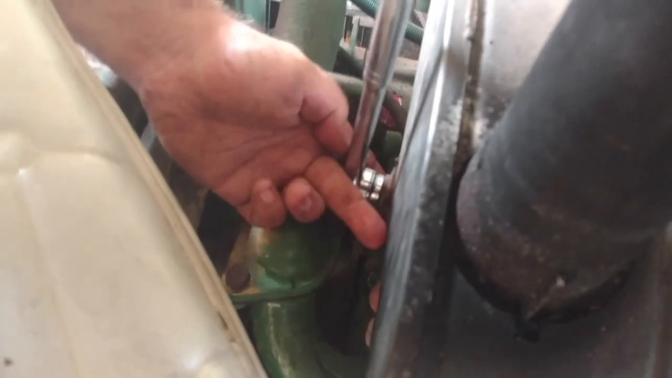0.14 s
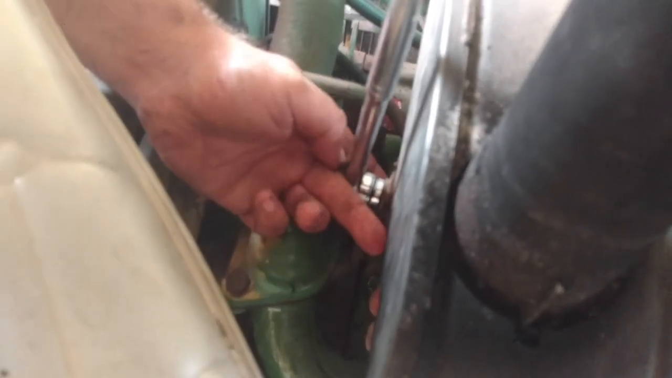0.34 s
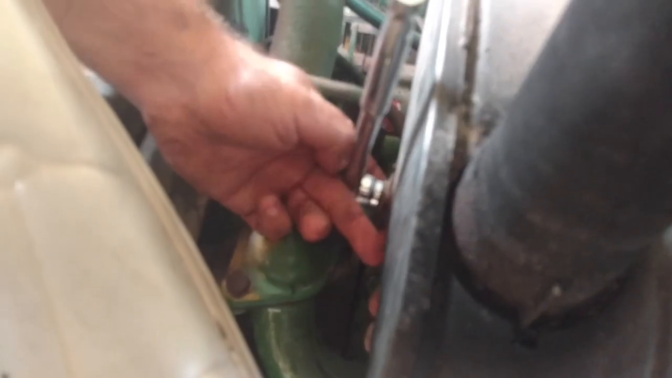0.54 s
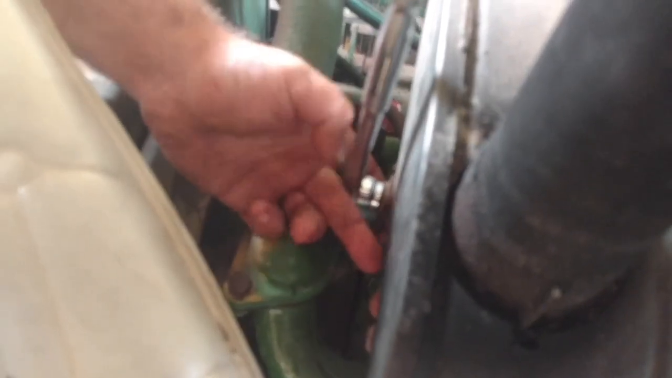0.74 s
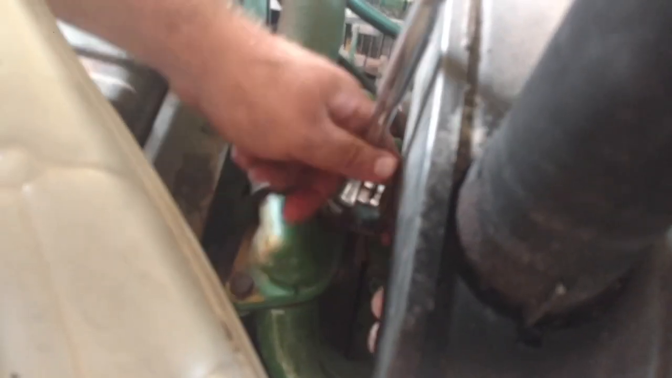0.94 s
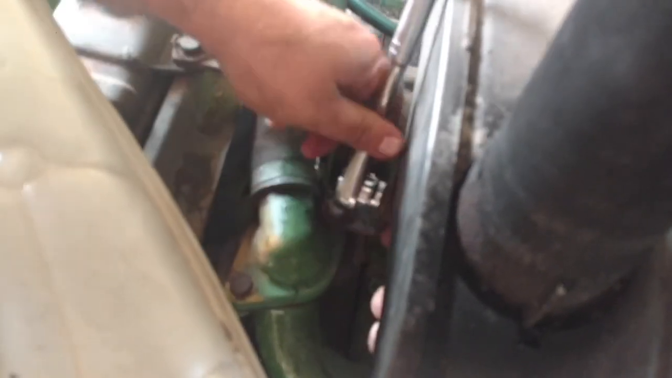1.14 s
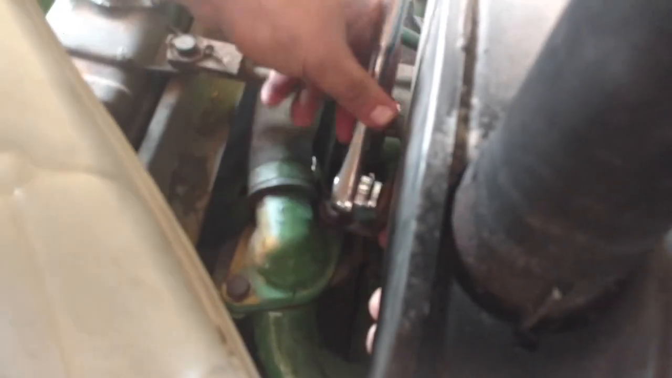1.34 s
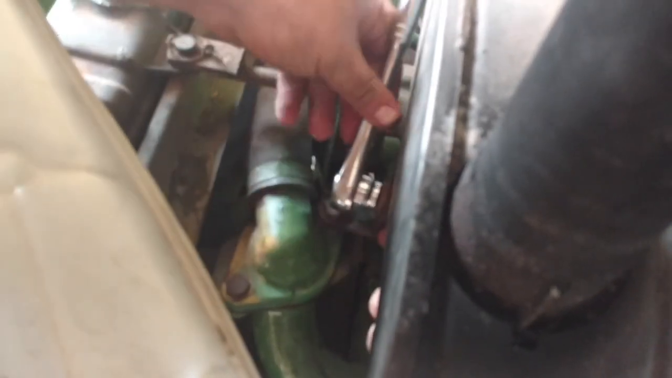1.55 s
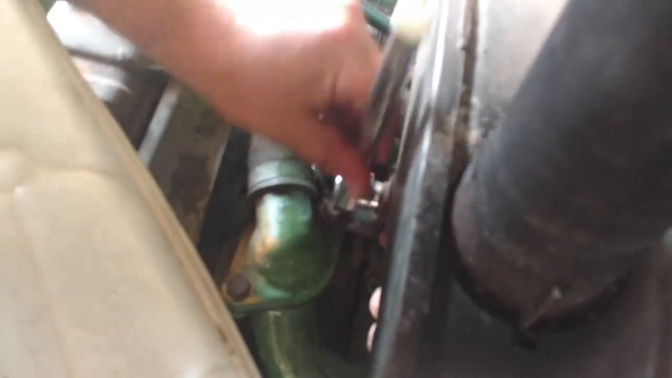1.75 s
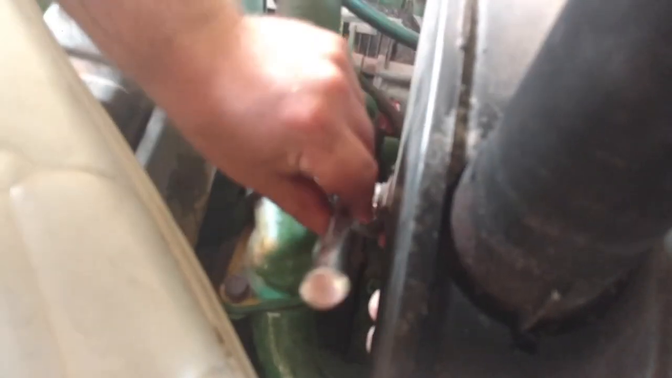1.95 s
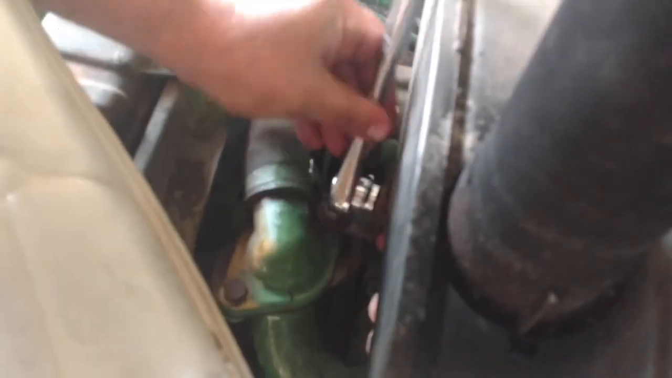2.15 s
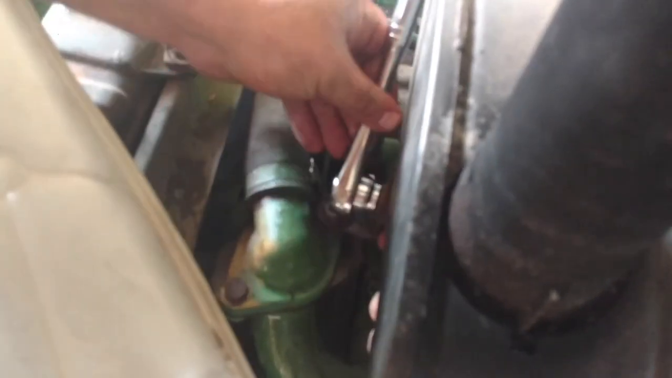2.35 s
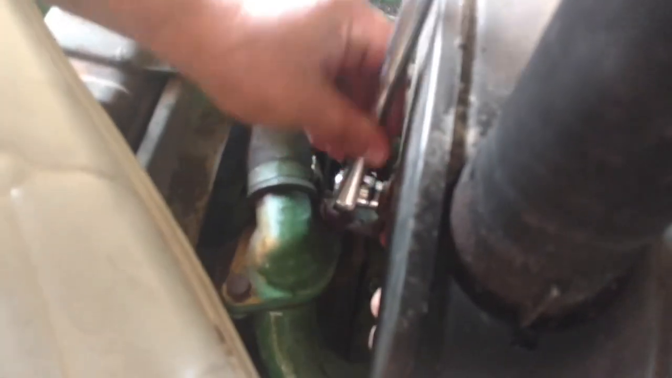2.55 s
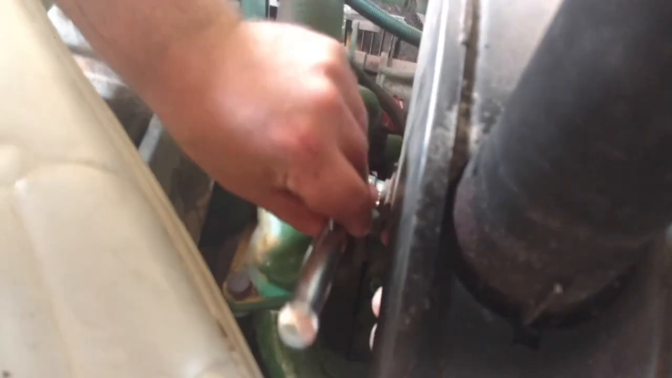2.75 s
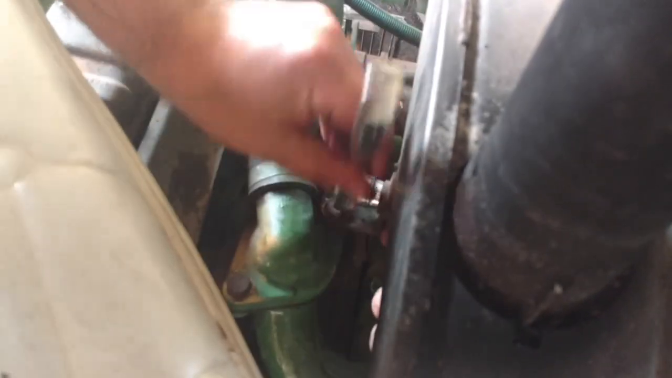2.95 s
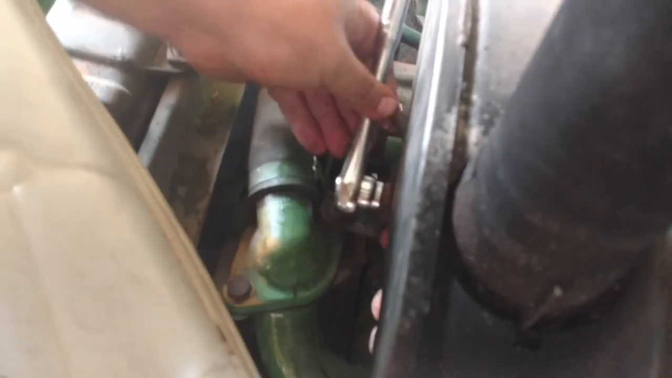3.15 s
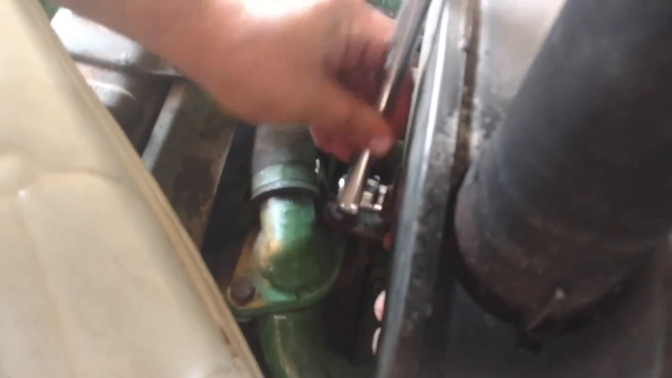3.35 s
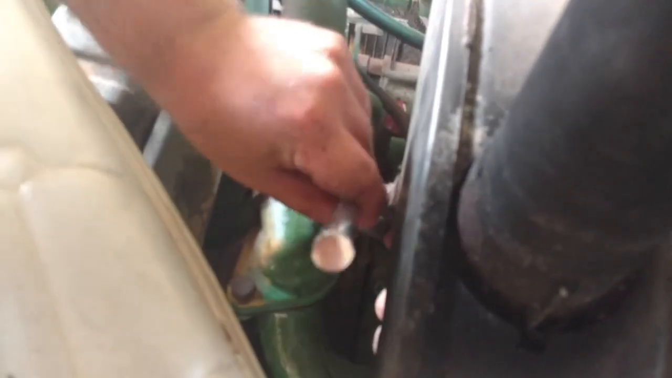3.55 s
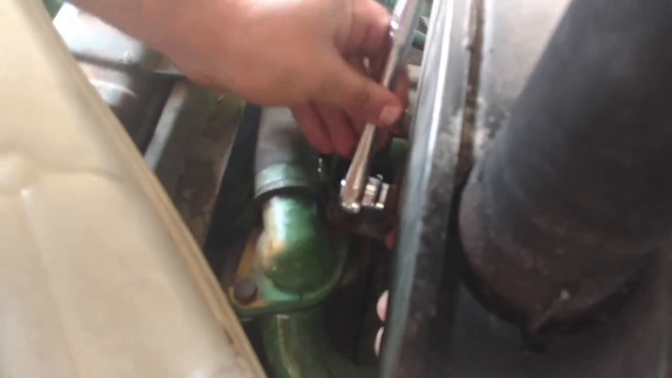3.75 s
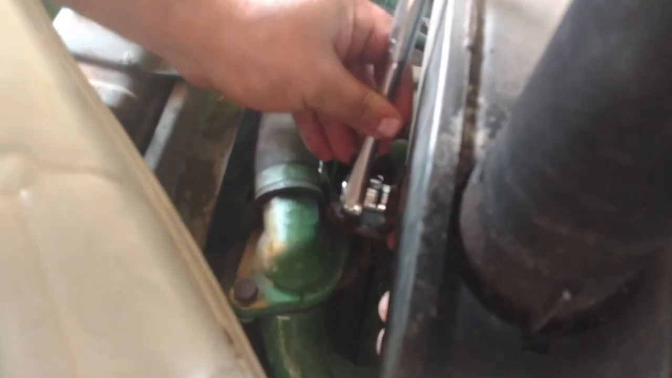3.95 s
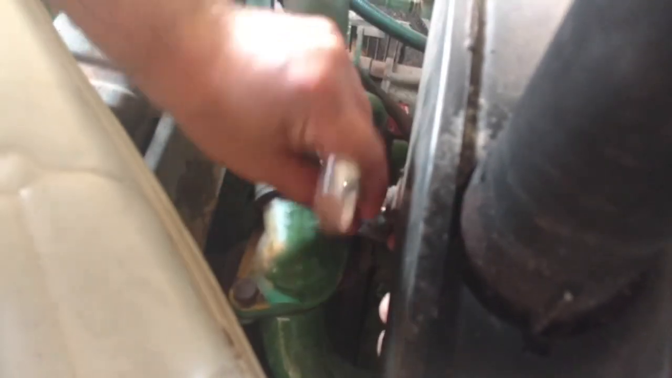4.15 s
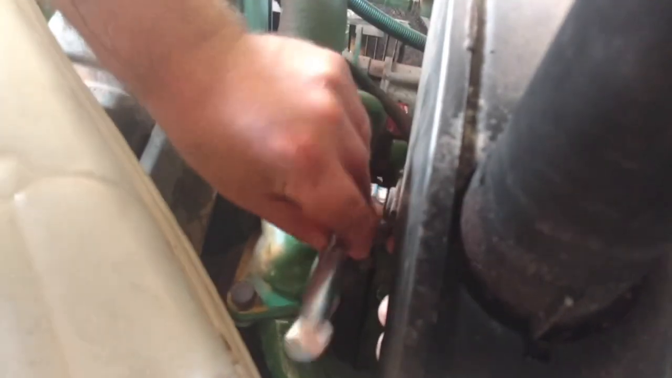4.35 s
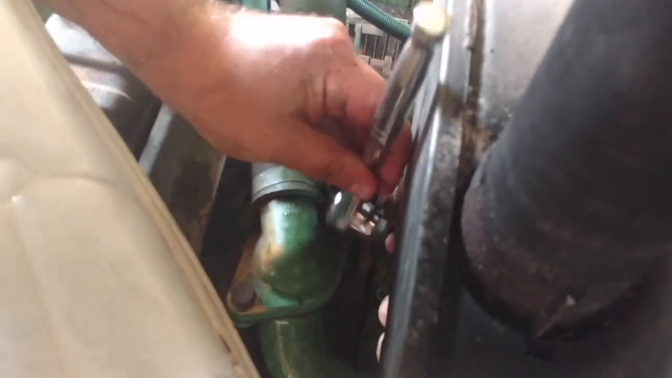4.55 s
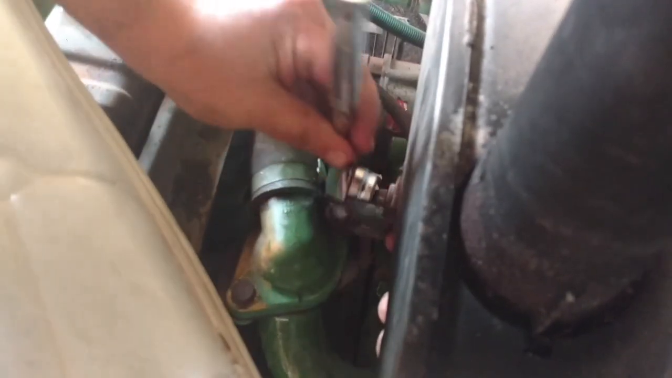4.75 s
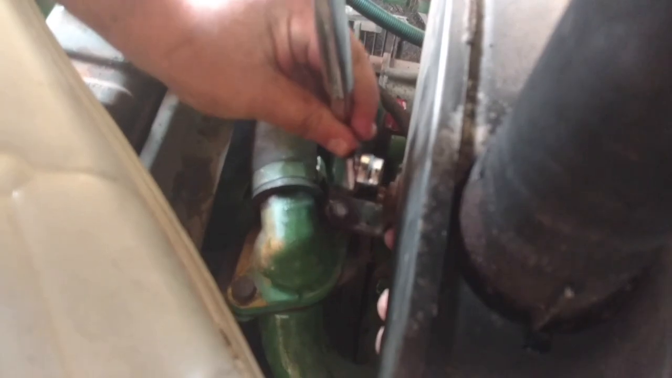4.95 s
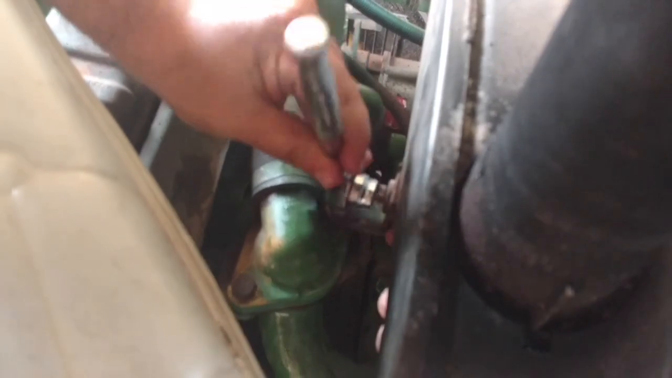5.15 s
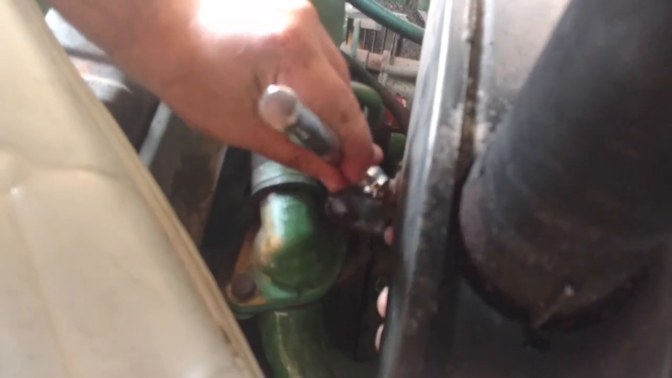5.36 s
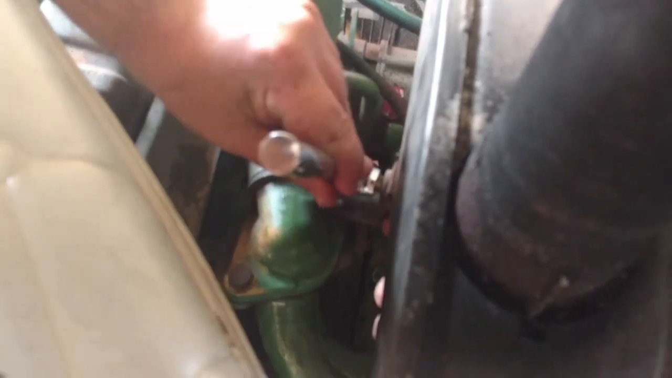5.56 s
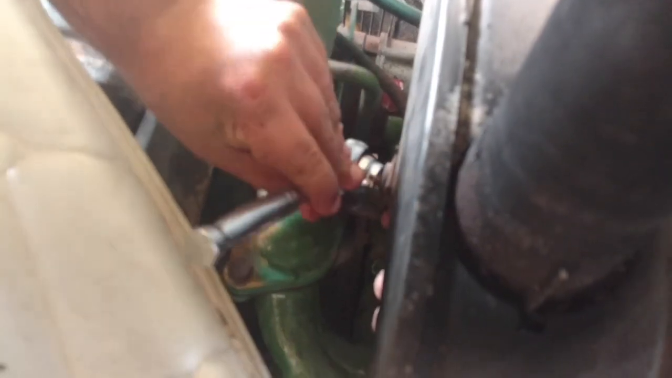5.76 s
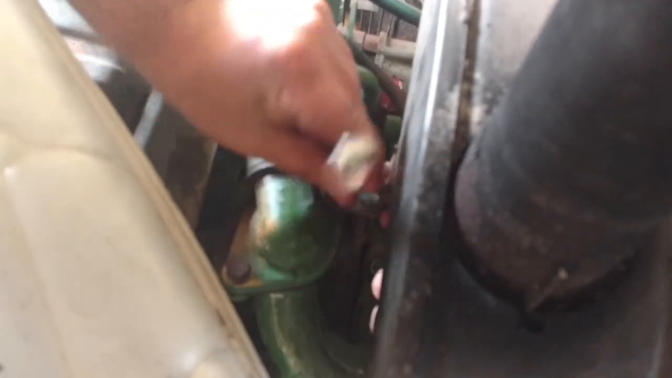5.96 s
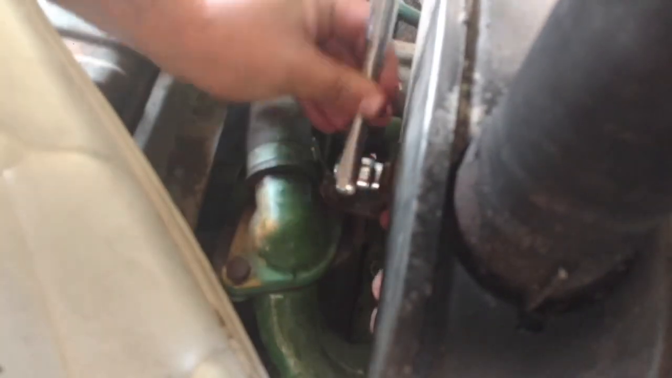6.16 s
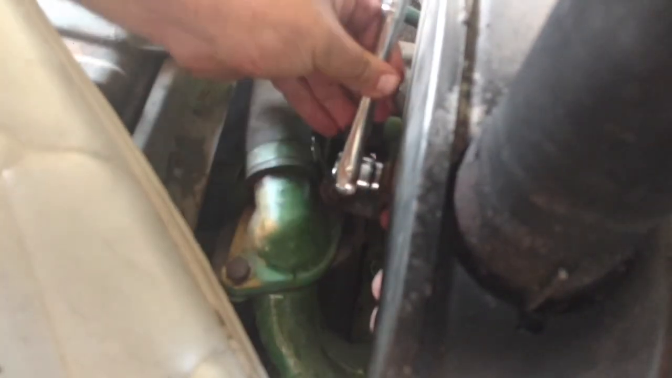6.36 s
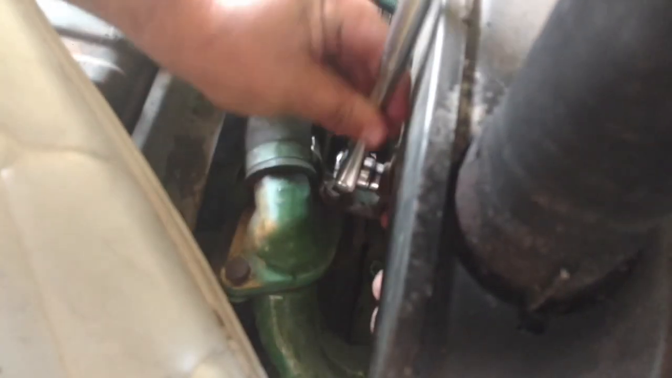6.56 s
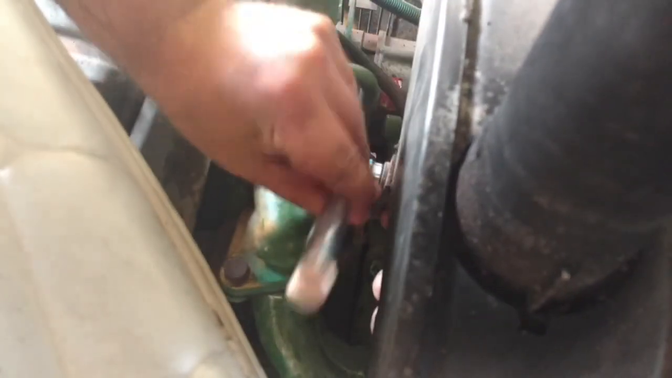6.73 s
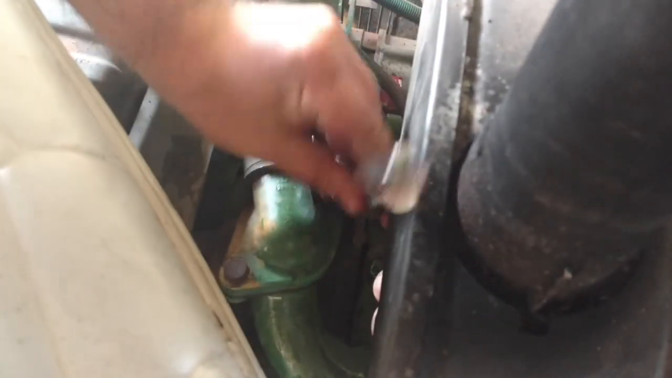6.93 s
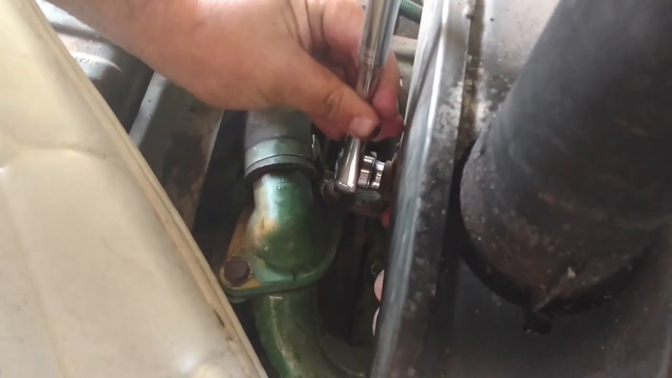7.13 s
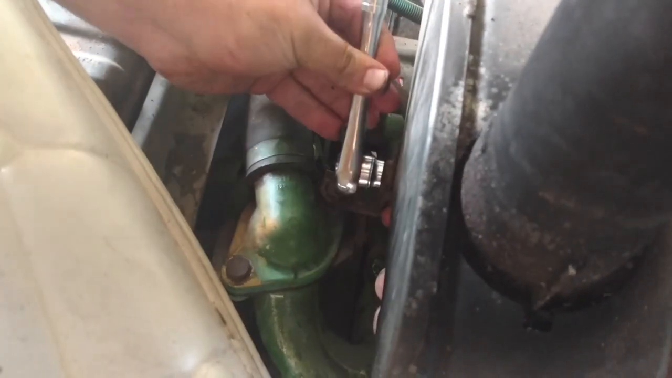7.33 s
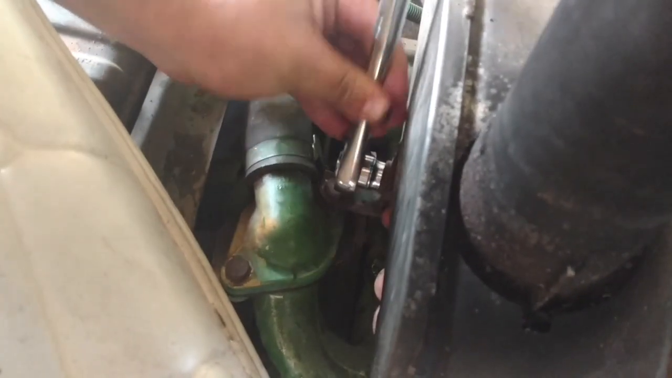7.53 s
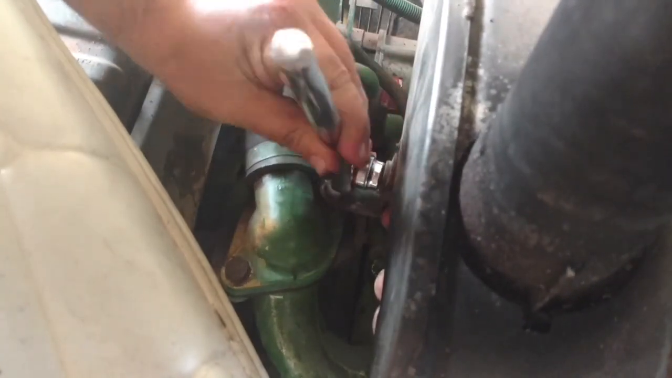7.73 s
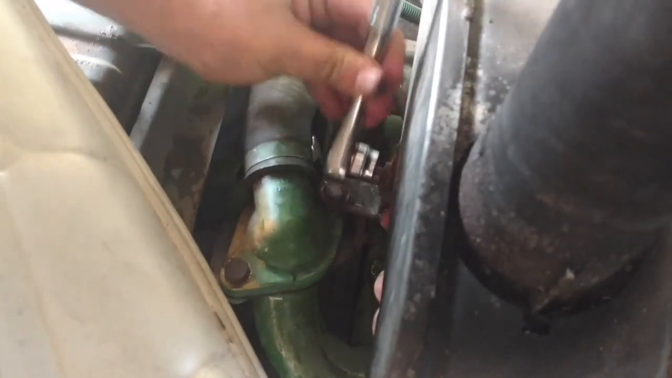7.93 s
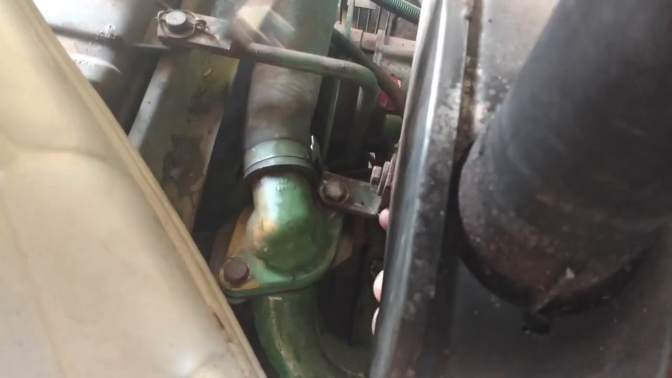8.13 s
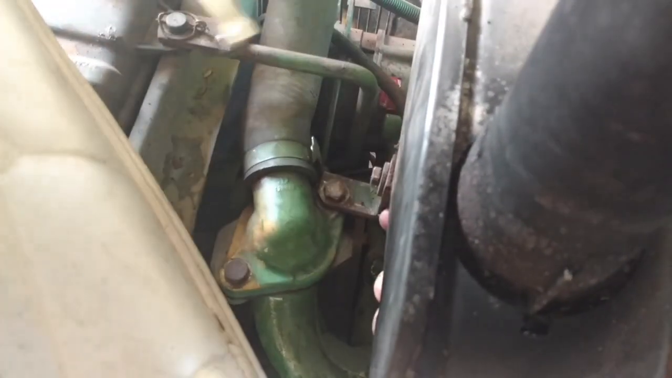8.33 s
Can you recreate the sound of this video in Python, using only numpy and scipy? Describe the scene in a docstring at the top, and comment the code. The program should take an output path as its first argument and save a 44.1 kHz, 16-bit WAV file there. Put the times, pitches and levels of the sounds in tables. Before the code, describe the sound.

Steel ratchet ticks, crisp and very short, alternate with duller clinks of the tool on engine castings. The first second is nearly quiet, then a loud clank; rapid click bursts follow around three and six seconds, with looser rattling and scraping between. Later contacts grow sparse and soft. Outdoor air, steady insects and faint hum surround the close stereo sound; short reflections from the metal, and two faint hoarse yaps from a small dog finish it.

```python
"""Socket ratchet inside an engine

A hand works a socket ratchet on a nut between the parts of a silent engine, outdoors.
Pawl snaps, knocks and rubbing drive damped resonators for the ratchet head and the engine castings.
Insects, hums and air are shaped noise; their level dips at some bright clicks, then climbs back.
A small dog yaps twice, as hoarse harmonic stacks. Two microphone ports lie apart."""
import sys
import numpy as np
from scipy import signal
from scipy.fft import rfft, irfft, next_fast_len
from scipy.io import wavfile
from scipy.ndimage import map_coordinates

SR = 44100
rng = np.random.default_rng(int(sys.argv[2]) if len(sys.argv) > 2 else 0)


def voltage_ratio(level):
    """Linear amplitude factor for a level in decibels (scalar or array-like)."""
    return 10 ** (np.asarray(level, float) / 20)


def transcribe(u):
    """Save the signal u as a 16-bit wav file named by the first command-line argument.

    u: samples, shape (n,) or (channels, n), limited to [-1, 1]; the rate is SR.
    q: integer samples, one column per channel.
    """
    v = np.clip(np.atleast_2d(u).T, -1, 1)
    q = np.round(v * 32767).astype(np.int16)
    wavfile.write(sys.argv[1], SR, q)


N = 369999


def rms_one(x):
    """Scales to rms 1."""
    return x / np.sqrt(np.mean(x ** 2) + 1e-20)


def in_time(rows):
    """Columns of a table interpolated over the scene; the first column is seconds."""
    s, *columns = np.transpose(rows)
    return [np.interp(np.arange(N) / SR, s, c) for c in columns]


def at_hz(points, hz):
    """Table value at each frequency, linear in log frequency."""
    table_hz, value = np.transpose(points)
    return np.interp(np.log(hz + 1), np.log(table_hz), value)


def drift(knots_per_s):
    """Slow chance: straight lines between random knots of spread 1."""
    knots = rng.standard_normal(int(N / SR * 40) + 2)
    position = np.arange(N) / SR * np.clip(knots_per_s, .1, 39)
    return map_coordinates(knots, [position], order=1)


def ring(drive, hz, t60_s):
    """Damped resonator: a unit click sets a sine of height 1 ringing."""
    r, w = voltage_ratio(-60 / (t60_s * SR)), 2 * np.pi * hz / SR
    return signal.lfilter([0, np.sin(w)], [1, -2 * r * np.cos(w), r * r], drive + 1e-18)


def strike(times_s, modes, strength_db, rise_s, contact_s, rattle_db, rattle_s):
    """Each contact, a sharp chatter and grainy dying rattle, strikes every mode by a chance strength."""
    low_cut_hz = 200   # struck sounds are cut below this
    age_s = np.arange(3000) / SR
    snap = (1 - np.exp(-age_s / rise_s)) * np.exp(-age_s / contact_s)
    noise, grain = rng.standard_normal((2, len(times_s), 3000))
    rattle = voltage_ratio(rattle_db) * np.exp(-age_s / rattle_s) * grain ** 2
    chatter = noise * (snap + rattle)
    chatter /= np.sqrt(np.sum(chatter[:, :200] ** 2, axis=1, keepdims=True))
    luck_db = 2 * rng.standard_normal((len(times_s), len(modes)))
    starts = np.round(times_s * SR).astype(int)
    at = np.minimum(starts[:, None] + np.arange(3000), N - 1)
    out = np.zeros(N)
    for k, (hz, db, t60_s) in enumerate(modes):
        # what the chatter holds at this pitch
        share = np.abs(chatter[:, :300] @ np.exp(2j * np.pi * hz * age_s[:300]))
        height = voltage_ratio(db + strength_db(hz) + luck_db[:, k]) / np.sqrt(share ** 2 + .25)
        blows = chatter * height[:, None]
        out += ring(np.bincount(at.ravel(), blows.ravel(), N), hz, t60_s) * (-1) ** k
    return signal.sosfilt(signal.butter(2, low_cut_hz, "high", fs=SR, output="sos"), out)


def thumps(times_s, db, hz, t60_s):
    """Short dull jolts, of opposite sign at the two ports."""
    clicks = np.bincount(np.round(times_s * SR).astype(int), voltage_ratio(db), N)
    band = signal.butter(2, [0.74 * hz, 4 * hz], "band", fs=SR, output="sos")
    return signal.sosfilt(band, ring(clicks, hz, t60_s)) * [[1], [-.75]]


# Pawl snaps and other steel-on-steel ticks.
# Each row: start in seconds, level in dB, modes below 7500 Hz re level in dB, thump re level in dB.
PAWL_TICKS = [(1.0153, -38.5, 3.5, -11), (1.4232, -17, -15, 2), (2.128, -21.5, 1, -39), (2.139, -23, 0, -4),
              (2.543, -51, 7, 6), (2.9962, -21, -3.5, -32), (3.0116, -22, -4, -11), (3.0269, -22, -7, -31),
              (3.0389, -19.5, -5, -5), (3.0515, -17, -35, -22), (3.0639, -26.5, -2, -23),
              (3.0754, -19.5, -16.5, 0.5), (3.0879, -23, -9.5, -25.5), (3.1047, -22.5, -57, -3),
              (3.689, -22.5, -7, -1), (3.7, -21.5, -8, -37), (3.712, -20.5, -10, -12),
              (3.8546, -45.5, 1.5, 3), (4.4767, -46, -22, 6), (4.5211, -41.5, -5, -2), (4.567, -25, 1, -20),
              (4.9732, -37, -1, -22), (5.3513, -18, -3, -24), (5.3663, -38, 11, -8), (5.453, -48.5, -1, -3),
              (5.898, -39.5, 2, 21), (6.0082, -17, -3, -40), (6.0255, -25, -27.5, -24),
              (6.11, -16.5, -17.5, -11), (6.13, -18, -8, -3), (6.147, -17, -15.5, -13),
              (6.1578, -22.5, -12, -18), (6.2305, -22.5, -10.5, -28), (6.3761, -21.5, -9, -20),
              (6.9584, -23, -1.5, -17), (7.5318, -43, -7, -14), (7.8677, -33.5, 0.5, 3),
              (7.9384, -52, 18, 5)]
# Ratchet head modes, damped by the hand. Each row: frequency in Hz, level in dB, t60 in seconds.
HEAD_MODES = [(900, -22.5, 0.012), (1940, -25.5, 0.0055), (3490, 1.5, 0.0043), (4590, 1.5, 0.005),
              (5390, -0.5, 0.0061), (6463, -3.5, 0.0086), (9050, -3, 0.00387), (8970, -7.5, 0.0042),
              (10510, 5, 0.0071), (11540, 2.5, 0.008), (12080, 4.5, 0.0023), (13600, -4, 0.0021),
              (14930, -15.5, .004), (15700, -16.5, .004)]


def ratchet():
    """Steel ticks ring the head: high modes follow the snap, lower ones how hard the tooth is met."""
    s, db, mid_db, thump_db = np.transpose(PAWL_TICKS)

    def strength_db(hz):
        return db - 1.5 + mid_db * (hz < 7500)
    head = strike(s, HEAD_MODES, strength_db, rise_s=.0004, contact_s=.0007,
                  rattle_db=-23.0, rattle_s=0.0063)
    return head + thumps(s, db + thump_db, hz=320, t60_s=0.0047)


# Tool against the engine.
# Each row: start in seconds, level in dB, centre in Hz, modes above 2400 Hz re level in dB.
TOOL_KNOCKS = [(0.446, -44, 490, -19), (0.902, -43, 778, 5.5), (0.986, -47.5, 1000, 0),
               (1.0132, -4.5, 1850, -14.5), (1.058, -14, 1850, -12), (1.085, -19.5, 1550, -15),
               (1.423, -49, 505, -24.5), (1.503, -26.5, 1230, -12), (1.527, -35.5, 630, -14),
               (1.644, -42.5, 568, -7), (2.007, -47, 920, -11.5), (2.037, -42.5, 1070, -6.5),
               (2.073, -19, 1670, -11.5), (2.299, -28, 1140, -16.5), (2.316, -34, 1140, -12),
               (2.477, -53.5, 1180, -15), (2.541, -38, 517, -7.5), (2.613, -42.5, 743, -15.5),
               (2.699, -51.5, 921, -9), (2.885, -42.5, 1140, -8), (2.915, -42.5, 1090, -17),
               (2.952, -49, 479, 0), (3.197, -43, 1180, -9.5), (3.245, -37, 706, -8.5),
               (3.267, -27.5, 1190, -12), (3.285, -33, 1120, -10.5), (3.461, -46, 770, -33.5),
               (3.547, -38.5, 540, -16), (3.618, -51, 1140, -1), (3.642, -46.5, 685, -16.5),
               (3.688, -35.5, 1370, -9), (3.709, -36, 1170, 0), (3.866, -23, 1160, -9),
               (4.052, -46, 1120, -6.5), (4.074, -37.5, 770, -8), (4.13, -39.5, 760, -10),
               (4.39, -44, 762, -22.5), (4.408, -45.5, 920, 0), (4.423, -37.5, 760, -23),
               (4.439, -34, 750, -7.5), (4.458, -41, 1140, -8), (4.476, -39, 912, -1.5),
               (4.49, -30.5, 560, -15), (4.506, -32, 885, -14), (4.522, -35.5, 1180, -4),
               (4.559, -34.5, 1030, -3), (4.566, -16.5, 1480, -8.5), (4.588, -27, 1060, -33),
               (4.7, -37.5, 1350, -34), (4.728, -41, 1160, -4), (4.975, -27, 870, -0.5),
               (5.005, -32, 725, -15), (5.02, -38.5, 1170, -7.5), (5.098, -34.5, 630, -7.5),
               (5.167, -36.5, 730, -9.5), (5.19, -32, 770, -3), (5.232, -43.5, 1150, -9),
               (5.3, -30, 778, -20), (5.322, -25.5, 785, -13.5), (5.349, -16, 940, -4.5),
               (5.453, -22, 910, -4), (5.474, -37, 781, -1), (5.517, -27.5, 750, -22),
               (5.533, -40.5, 590, -3.5), (5.626, -36.5, 745, -19), (5.642, -25, 810, -15.5),
               (5.666, -26.5, 580, -10), (5.688, -34.5, 595, -12.5), (5.708, -34, 760, -12),
               (5.73, -37, 581, -13), (5.889, -26.5, 694, -13), (5.906, -25, 900, -6),
               (5.93, -44, 1170, 6.5), (5.95, -31, 646, -14), (5.991, -33.5, 1150, -2.5),
               (6.007, -34, 1280, -1), (6.321, -50.5, 1120, -5.5), (6.445, -50.5, 820, -8.5),
               (6.486, -48, 767, -12), (6.591, -48.5, 764, -17), (6.889, -48, 767, -36),
               (6.932, -45.5, 920, -12.5), (6.961, -37, 1230, -11), (7.025, -49, 780, -20.5),
               (7.102, -46.5, 770, -14.5), (7.259, -53, 465, -3), (7.454, -42, 537, -24.5),
               (7.47, -43.5, 800, -8), (7.527, -40.5, 765, -1), (7.634, -51, 773, -32),
               (7.818, -33, 440, -18), (7.873, -31, 1440, -10), (7.936, -25, 1060, -6)]
# Soft bumps of the hand. Each row: start in seconds, level in dB.
HAND_BUMPS = [(2.756, -34), (3.546, -30.5), (6.744, -50)]
# Engine castings and pipes. Each row: frequency in Hz, level in dB, t60 in seconds.
ENGINE_MODES = [(261, -14.5, 0.46), (354, -16.5, 0.13), (462, -4.5, 0.024), (558, -3.5, 0.035),
                (678, -9.5, 0.1), (740, 1, 0.022), (913, 0, 0.015), (976, -10, 0.094), (1140, 0.5, 0.037),
                (1280, -2, 0.026), (1423, -4.5, 0.038), (1699, 1, 0.027), (1980, 0.5, 0.024),
                (2116, 4, 0.013), (2820, 12.5, 0.0039), (3814, 8.5, 0.0057), (4020, 12.5, 0.0012),
                (6134, -2.5, 0.0061), (6930, -13.5, 0.016), (8700, -7.5, 0.011)]


def knocks():
    """Blows favour low modes around their centre; the treble has its own level in each blow."""
    nut_db, nut_hz, nut_treble_db = -22, 800, -0.5   # every tick also knocks the iron through the nut
    jolt_db, jolt_hz = -28, 170   # engine block under each knock, re its level
    through_nut = [(s, db + nut_db, nut_hz, nut_treble_db) for s, db, *_ in PAWL_TICKS]
    s, db, centre_hz, treble_db = np.transpose(TOOL_KNOCKS + through_nut)
    narrow = voltage_ratio(-.1 * (db + 28))   # a light touch sounds fewer modes

    def strength_db(hz):
        if hz > 2400:
            return db - 4 + treble_db
        slope = np.where(hz > centre_hz, 7., 4.)
        return db - 4 - narrow * slope * np.log2(hz / centre_hz) ** 2
    contact_s = 0.00044 * voltage_ratio(-.3 * (db[:, None] + 8.5))   # a light touch drags, a hard blow is short
    blows = strike(s, ENGINE_MODES, strength_db, 0.000092, contact_s, rattle_db=-22, rattle_s=0.0094)
    bump_s, bump_db = np.transpose(HAND_BUMPS)
    bumps = thumps(bump_s, bump_db, hz=113, t60_s=0.033)
    return blows + bumps + thumps(s, db + jolt_db, jolt_hz, t60_s=0.019)


# Socket rubbing and wobbling on the nut; a row that ends before it starts is silent.
# Each row: start, hardest moment and end in seconds, hardest level in dB, treble re body in dB.
SOCKET_RUBS = [(0.808, 1.024, 1.7, -68.5, -15), (1.965, 2.198, 2.4, -78, -15.5),
               (2.45, 2.702, 3.1, -74.5, -12.5), (3.546, 3.843, 4.2, -74, -16),
               (4.363, 4.555, 4.78, -52.5, -10.5), (4.898, 5.19, 5.56, -56.5, -12),
               (5.567, 5.895, 6.3, -58.5, -6), (6.85, 6.95, 5, -71.5, -12.5),
               (7.412, 7.505, 8.05, -72.5, -8.5)]


def rubbing():
    """Dense uneven little contacts sound through the castings, with a treble share for each rub."""
    rumble_db, rumble_hz, rumble_t60_s = -9, 149, 0.042   # dull part, re body
    light_db = -69.5   # where each rub starts and ends
    sizes = voltage_ratio(5.0 * np.minimum(rng.exponential(1, N), 4)) * rng.choice([-1, 1], N)
    grains_per_s = 900 * voltage_ratio(5 * drift(35))
    grains = sizes * (rng.random(N) < grains_per_s / SR)

    def castings(high):
        return rms_one(sum(voltage_ratio(db) * ring(grains, hz, t60_s)
                           for hz, db, t60_s in ENGINE_MODES if (hz > 2400) == high))
    rumble = ring(ring(grains, rumble_hz, rumble_t60_s), rumble_hz, rumble_t60_s)
    body = castings(False) + voltage_ratio(rumble_db) * rms_one(rumble)
    treble = castings(True)
    out, t = np.zeros(N), np.arange(N) / SR
    for start, hardest, end, top_db, treble_db in SOCKET_RUBS:
        db = np.interp(t, [start, hardest, end], [light_db, top_db, light_db])
        touching = np.clip(np.minimum(t - start, end - t) / 0.022, 0, 1)
        out += touching * voltage_ratio(db) * (body + voltage_ratio(treble_db) * treble)
    return out


# Each row: start in seconds, length in seconds, reference pitch of the second harmonic in Hz, level in dB.
DOG_YAPS = [(7.836, 0.103, 1648, -42.5), (8.166, 0.15, 1668, -40)]
# Level in dB of each harmonic, from the fundamental up.
HARMONICS_DB = [-15, 0, -14, -12, -24, -15, -26, -23]
# Course of one yap. Each row: seconds after its start, share of the reference pitch, level in dB.
PITCH_ARCH = [(.008, .8, -8.5), (.02, .96, -5.5), (.042, 0.97, -1), (.075, 0.96, -7.5), (0.095, .87, -3),
              (.125, .8, -13.5), (.16, 0.69, -10)]


def dog():
    """A short harmonic stack on an arched pitch; hoarse, more so in the upper harmonics."""
    out, t = np.zeros(N), np.arange(N) / SR
    rasp = signal.lfilter([.03], [1, -.97], rng.standard_normal((len(HARMONICS_DB), N)))
    age_s, share, arch_db = np.transpose(PITCH_ARCH)
    for start, length, top_hz, top_db in DOG_YAPS:
        second_hz = top_hz * np.interp(t - start, age_s, share)
        db = top_db + np.interp(t - start, age_s, arch_db)
        gate = np.clip(np.minimum(t - start, start + length - t) / 0.0037, 0, 1)
        # pi, not 2 pi: the fundamental is half the second harmonic
        phase = np.cumsum(np.pi * second_hz * (1 + 0.00977 * drift(35))) / SR
        stack = np.zeros(N)
        for k, harmonic_db in enumerate(HARMONICS_DB, start=1):
            stack += voltage_ratio(harmonic_db) * np.sin(k * phase + .9 * k * rasp[k - 1])
        out += gate * voltage_ratio(db + 3.3 * drift(37.27)) * stack
    return out


def echoes(x, t60_s, cut_hz, unlike):
    """Diffuse dull reflections, partly different at the two ports."""
    t = np.arange(SR // 2) / SR
    shared, *own = rng.standard_normal((3, len(t)))
    tail = (shared + unlike * np.array(own)) * voltage_ratio(-60 * t / t60_s) * (t > .002)
    r = np.exp(-2 * np.pi * cut_hz / SR)
    tail = signal.lfilter([1 - r], [1, -r], tail)
    tail /= np.sqrt(np.sum(tail ** 2) / 2)
    return signal.fftconvolve(x + np.zeros((2, 1)), tail, axes=1)[:, :N]


# Each row: frequency in Hz, left-right likeness from -1 to 1.
PORT_LIKENESS = [(45, -.3), (90, 0.056), (200, -0.075), (500, 0.84), (1200, 1), (16000, 0.84)]


def stereo_noise(gain_of_hz):
    """Coloured noise, alike in both channels as far as the table says; rms 1."""
    size = next_fast_len(N)
    hz = np.fft.rfftfreq(size, 1 / SR)
    mid, side = rfft(rng.standard_normal((2, size)))
    alike = np.clip(at_hz(PORT_LIKENESS, hz), -1, 1)
    pair = np.sqrt(1 + alike) * mid + np.sqrt(1 - alike) * side * [[1], [-1]]
    return rms_one(irfft(pair * gain_of_hz(hz), size)[:, :N])


def humps(table):
    """Gain of a set of steep-sided resonances."""
    def gain(hz):
        power = sum(voltage_ratio(2 * db) / width_hz / (1 + (2 * (hz - centre_hz) / width_hz) ** 2) ** 3
                    for centre_hz, width_hz, db in table)
        return np.sqrt(power)
    return gain


# The surroundings sink at some bright clicks. Each row: time in seconds, reference level just after in dB.
LEVEL_DIPS = [(0, -72.5), (1.43, -78.5), (2.142, -77.5), (3.05, -77.5), (3.71, -77), (6.011, -70.5),
              (6.141, -75), (6.38, -78)]


def swell():
    """Reference level of the surroundings in dB: a steady climb from the last dip, drops rounded."""
    climb_db_per_s, sink_s = 8.5, 0.011
    t, (s, db) = np.arange(N) / SR, np.transpose(LEVEL_DIPS)
    last = np.maximum(np.searchsorted(s, t, side="right") - 1, 0)
    r = np.exp(-1 / (sink_s * SR))
    climb_db = db[last] - db[0] + climb_db_per_s * (t - s[last])
    return db[0] + signal.lfilter([1 - r], [1, -r], climb_db)


# Insect song. Each row: frequency in Hz, width in Hz, level in dB.
INSECT_BANDS = [(8097, 280, -7), (10184, 750, 1), (9680, 1900, -5)]
# Far hum. Each row: frequency in Hz, width in Hz, level in dB.
HUM_BANDS = [(136, 37, -1.5), (253.2, 4.4, -6)]
# Hum that wanes. Each row: frequency in Hz, width in Hz, level in dB.
WANING_HUM_BANDS = [(97.8, 7, -1.5), (479, 7.2, -6)]
# Level of the waning hum. Each row: time in seconds, level re the swell in dB.
HUM_WANES = [(0, -1.5), (.5, 3.5), (1.41, -4), (1.6, -5), (5.6, -12), (8.39, -10.5)]
# Colour of the outdoor air. Each row: frequency in Hz, relative density in dB per Hz.
AIR_COLOUR = [(30, -36.5), (70, -25), (120, -2), (500, -6), (1200, -7.5), (2500, -20.5), (6000, -25.5),
              (10500, -14.5), (11500, -36), (16000, -30.5)]


def surroundings():
    """Insect chorus, narrow noise bands as wavering hums, and broad outdoor air."""
    insects_db, hum_db, broad_db = 5, -4.5, 3.5
    air_follows = 0.83   # share of the swell's swing
    swell_db, (waning_db,) = swell(), in_time(HUM_WANES)
    air_db = swell_db.mean() + air_follows * (swell_db - swell_db.mean())
    insects = voltage_ratio(swell_db + insects_db + 1.5 * drift(30)) * stereo_noise(humps(INSECT_BANDS))
    hum = voltage_ratio(air_db + hum_db) * stereo_noise(humps(HUM_BANDS))
    waning_hum = voltage_ratio(swell_db + waning_db) * stereo_noise(humps(WANING_HUM_BANDS))
    air_noise = stereo_noise(lambda hz: voltage_ratio(at_hz(AIR_COLOUR, hz)))
    air = voltage_ratio(air_db + broad_db + 1.3 * drift(4.6)) * air_noise
    return insects + hum + waning_hum + air


def scene():
    """Near tool and iron with reflections, the far dog, the surroundings."""
    head, iron, yaps = ratchet(), knocks() + rubbing(), dog()
    head_pan_db = 1.5 * np.array([[.5], [-.5]])   # the ratchet head sits left of the castings
    near = voltage_ratio(head_pan_db) * head + iron
    near = near + voltage_ratio(-18.0) * echoes(head, 0.19, 9000, unlike=0.43)
    near = near + voltage_ratio(-14.5) * echoes(iron, 0.18, 3200, unlike=.6)
    far = yaps + voltage_ratio(-10) * echoes(yaps, .4, 4000, unlike=.4)
    return near + far + surroundings()


def roll_off(x):
    """The treble ends steeply here."""
    return signal.sosfilt(signal.butter(12, 16630, fs=SR, output="sos"), x)


# Colour of the hiss. Each row: frequency in Hz, relative density in dB per Hz.
HISS_COLOUR = [(60, -8.5), (500, -4.5), (2000, -8), (6000, -7), (10500, -27.5), (11500, -39),
               (13500, -10.5), (15200, -17), (16000, -38.5)]
# Right port ahead of the left. Each row: frequency in Hz, lead in radians.
RIGHT_LEAD = [(0, 1), (1300, 0.028), (2450, 2.97), (5100, 9.254), (7700, 14.76), (10300, 21.62),
              (16000, 35.5)]
# Each row: frequency in Hz, left re right in dB.
LEFT_RIGHT_BALANCE = [(100, -4), (700, -1.5), (2500, -3), (5500, 0), (9000, 1.5), (15000, -0.5)]


def record(dry):
    """Steady hiss, phase lead and balance between the ports, a cut in the deep bass."""
    hiss_db = -74
    x = dry + voltage_ratio(hiss_db) * stereo_noise(lambda hz: voltage_ratio(at_hz(HISS_COLOUR, hz)))
    size = next_fast_len(N + 999)
    hz, half = np.fft.rfftfreq(size, 1 / SR), np.array([[.5], [-.5]])
    lead_rad = np.interp(hz, *np.transpose(RIGHT_LEAD))
    ports = voltage_ratio(half * at_hz(LEFT_RIGHT_BALANCE, hz)) * np.exp(-1j * half * lead_rad)
    x = irfft(rfft(x, size) * ports, size)[:, :N]
    x = signal.sosfilt(signal.butter(2, 95, "high", fs=SR, output="sos"), x)
    return roll_off(np.clip(x, -1, 1))


dry = scene()
out = record(dry)
transcribe(out)
```